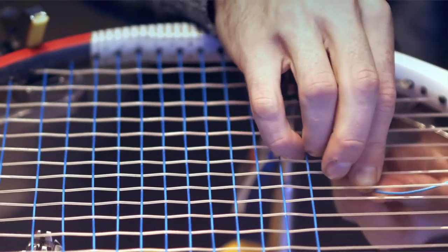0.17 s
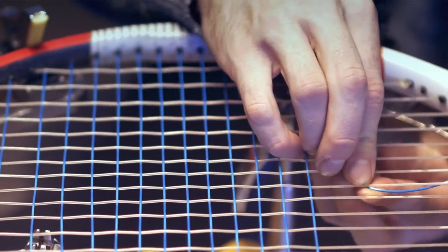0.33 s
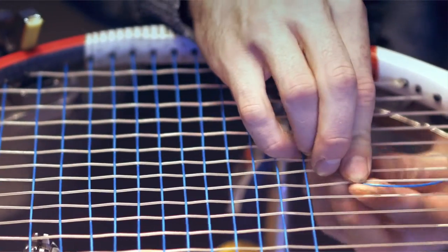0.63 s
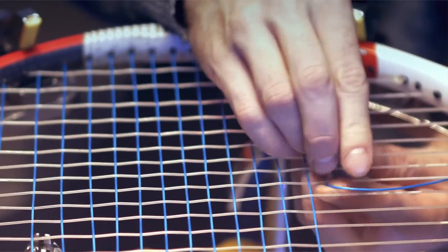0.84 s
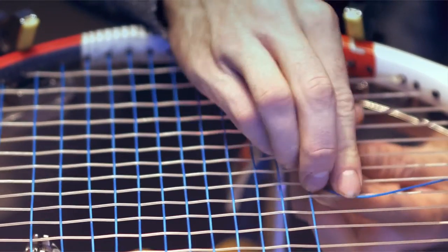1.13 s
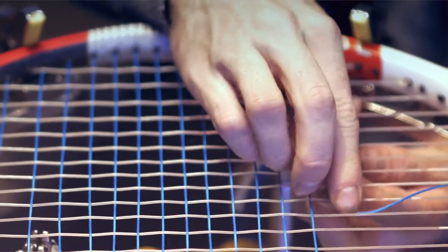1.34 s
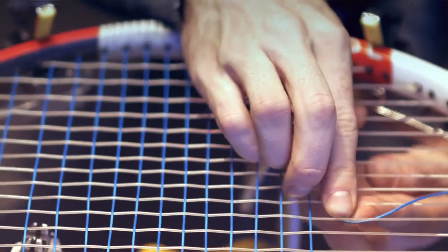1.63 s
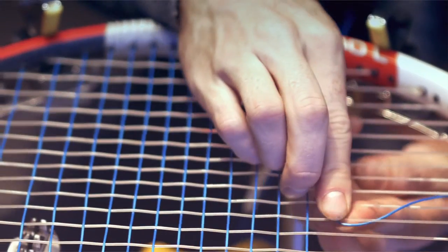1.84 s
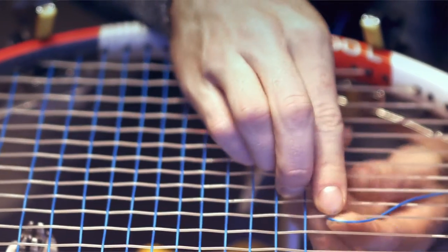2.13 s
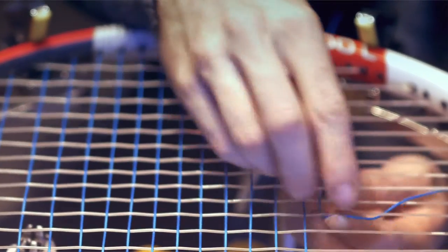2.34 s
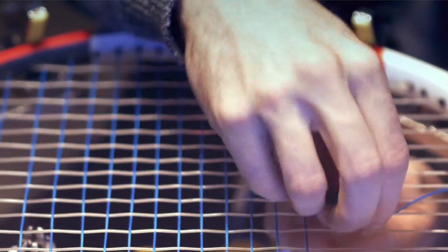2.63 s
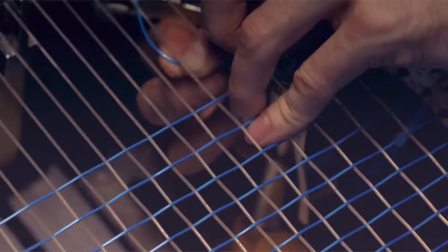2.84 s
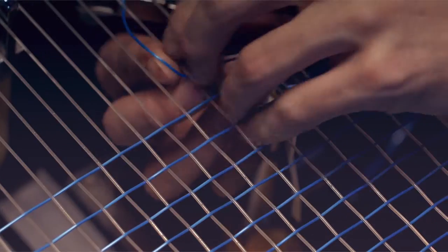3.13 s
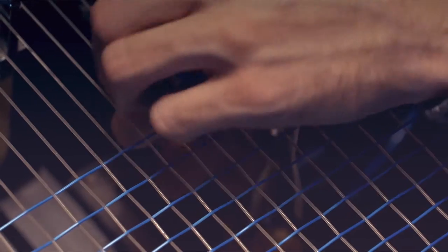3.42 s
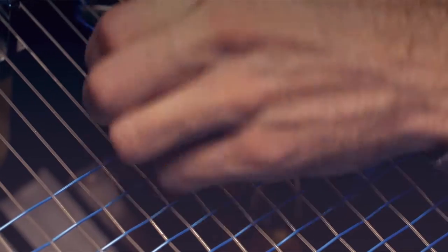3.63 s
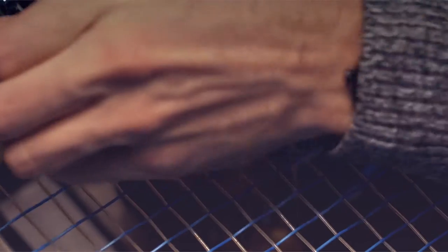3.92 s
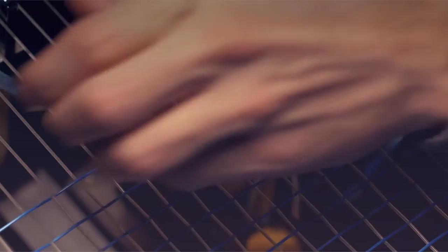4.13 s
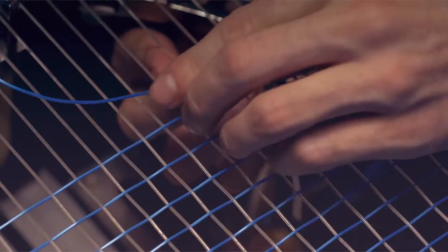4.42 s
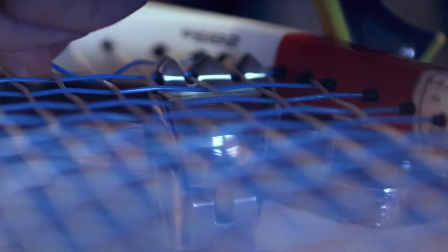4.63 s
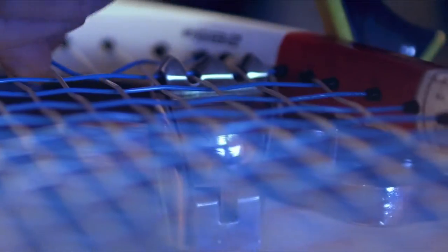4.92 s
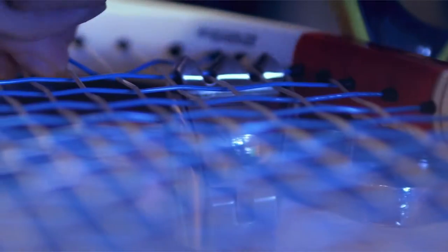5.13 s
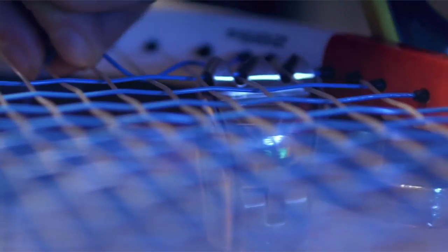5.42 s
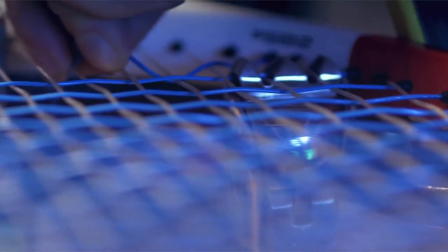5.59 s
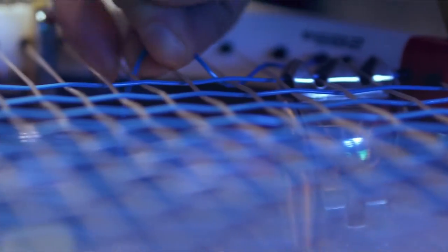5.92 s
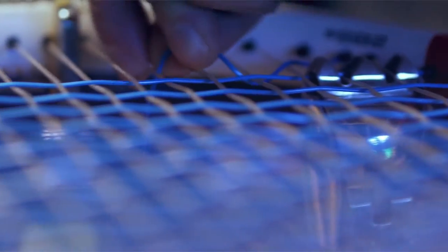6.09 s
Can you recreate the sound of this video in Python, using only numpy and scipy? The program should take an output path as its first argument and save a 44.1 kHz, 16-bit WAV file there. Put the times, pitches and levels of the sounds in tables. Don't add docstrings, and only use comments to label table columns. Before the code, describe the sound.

Stiff string is worked through a taut string bed, heard close with short, bright room reflections. Sparse snaps and soft rubs mix with muffled knocks on the frame and faint plucked twangs. A quick double flick follows midway, then a pause, light metal taps and a hard clamp clack. The background of rumble, hiss and electrical hum shifts subtly twice; hand movement ends it.

```python
import sys
import numpy as np
from scipy import signal
from scipy.fft import rfft, irfft, next_fast_len
from scipy.io import wavfile
from scipy.ndimage import uniform_filter1d, map_coordinates

SR = 44100
rng = np.random.default_rng(int(sys.argv[2]) if len(sys.argv) > 2 else 0)


def field_ratio(decibels):
    return 10 ** (np.asarray(decibels, dtype=float) / 20)


def transcribe(signal):
    frames = np.atleast_2d(signal).T
    limited = np.clip(frames, -1, 1)
    pcm = np.round(limited * 32767).astype(np.int16)
    wavfile.write(sys.argv[1], SR, pcm)


N = 275911
RING = SR * 3 // 5

# (time [s], peak level [dB], left-right [dB], room answer [dB])
SOFT_SNAP = [
    (0.3478, -36, -1, 4.8),
]
HARD_SNAP = [
    (1.7136, -30.5, -2, 6),
]
FLICKS = [
    (3.822, -35, .5, 5.5),
    (3.8275, -29.5, -.5, 0.5),
]
TICKS = [(2.676, -53, -1, 4), (3.218, -58, 1.5, 3), (3.49, -65, 0, 0), (3.649, -58, -1.5, 3),
         (3.731, -54, -.5, 0), (3.763, -61, .5, 0), (3.789, -54, .5, 0), (4.794, -62, 1.5, 3),
         (5.174, -63, .5, 0), (5.25, -65, 0, 0), (6.085, -65, 0, 0)]
RUBS = [
    (1.03, -65, 0, 3.9),
    (3.075, -66, 0.086, 4.1),
    (4.1186, -53, 1, 6.4),
    (4.386, -64, 0.11, 4.8),
    (4.402, -65, 0, 3.6),
]
# (frequency [Hz], density [dB per Hz])
SOFT_SNAP_COLOUR = [(88, -30), (150, -15.5), (239, -6), (471, -29), (550, -9.5), (827, -40), (948, -11),
                    (1020, -28), (1370, -9), (1660, -29), (3690, -15.5), (9920, -14.5), (15500, -22.5)]
HARD_SNAP_COLOUR = [(47, -49), (80, -20.5), (236, -0.5), (366, -20), (391, -10.5), (635, -13.5),
                    (884, -21.5), (1370, 2.5), (1830, -20), (2840, -4), (3540, -12.5), (8550, -3.5),
                    (15500, -14.5)]
FLICK_COLOUR = [(180, -37), (300, -12), (553, -6.5), (620, -15), (769, -18), (1260, -12), (1540, -21),
                (2040, -15.5), (3020, -10.5), (5480, -7.5), (7880, -7.5), (10400, 6), (15500, -5)]
TICK_COLOUR = [(1000, -51), (2000, -30.5), (3000, -15.5), (5000, -16), (8000, -23), (10000, 3),
               (13000, -14.5), (15500, -19.5)]
RUB_COLOUR = [(470, -52), (800, -6), (1270, 5), (1470, -5), (1880, -0.5), (5400, -4), (8030, -6),
              (10200, 3), (15500, -10.5)]
# (frequency [Hz], width [Hz], lift [dB])
SOFT_SNAP_MODES = [(1806, 77, 15.5), (4000, 1100, 4.5), (5300, 300, 2), (6440, 230, 2)]
HARD_SNAP_MODES = [(1166, 57, 10), (2834, 48, 5.9), (3030, 45, 11), (4260, 450, 7.2), (4740, 300, 9),
                   (6540, 220, 9.8), (8360, 200, 7.7), (10100, 620, 9)]
FLICK_MODES = [(200, 49, 6.9), (490, 44, 9.9), (2020, 100, 7.8), (2580, 60, 8.5), (4000, 170, 6.4),
               (5350, 80, 11), (6000, 200, 4.8), (6460, 350, 5.9), (9840, 1000, 5.6)]
RUB_MODES = [(2620, 110, 3.1), (5540, 120, 5), (6400, 270, 7.5), (8500, 130, 4.9)]


def string():
    soft_snap = contacts(SOFT_SNAP, SOFT_SNAP_COLOUR, SOFT_SNAP_MODES,
                         chatter_s=0.0023, build_s=0.0098, echo=(.008, .5))
    hard_snap = contacts(HARD_SNAP, HARD_SNAP_COLOUR, HARD_SNAP_MODES,
                         chatter_s=0.0029, build_s=0.014, echo=(.008, .6))
    flicks = contacts(FLICKS, FLICK_COLOUR, FLICK_MODES, chatter_s=0.0036, build_s=0.015)
    ticks = contacts(TICKS, TICK_COLOUR, [], chatter_s=0.002, build_s=0.0073)
    rubs = contacts(RUBS, RUB_COLOUR, RUB_MODES, chatter_s=0.005, build_s=0.013)
    return soft_snap + hard_snap + flicks + ticks + rubs


# (time [s], peak level [dB], pitch [Hz], T60 [s])
TWANGS = [
    (1.865, -59.5, 518, 0.17),
    (2.68, -60.5, 499, 0.32),
    (2.915, -58, 465, 0.27),
    (3.074, -44.5, 470, .15),
    (3.237, -52.5, 470, 0.21),
    (3.39, -59, 453, 0.15),
    (3.585, -59.5, 480, 0.33),
    (3.835, -61, 615, 0.23),
    (4.14, -64, 615, 0.19),
    (4.42, -67, 617, .25),
]
# (time [s], peak level [dB], pitch [Hz], T60 [s])
RINGS = [(1.73, -53.5, 1386, .42), (1.716, -64, 3030, 0.29), (1.717, -60, 4700, .35),
         (3.828, -64, 5460, 0.74), (5.251, -72.5, 4600, 0.14), (5.249, -71, 3150, 0.18),
         (5.493, -41.5, 2940, .45), (5.492, -44.5, 1207, 0.28), (5.492, -55, 865, 0.27),
         (6.24, -68, 1450, 0.14), (5.492, -52.5, 5310, .55), (5.492, -49.5, 663, 0.56)]


def string_bed():
    twangs = sum(decaying(s, db, hz, t60, attack_s=0.0041) for s, db, hz, t60 in TWANGS)
    rings = sum(decaying(s, db, hz, t60, attack_s=0.002, flutter=.8, rate=hz / 20)
                for s, db, hz, t60 in RINGS)
    return twangs + rings


def squeal():
    start_s, start_hz, level_db = 5.8, 2450, -78
    sag_hz_per_s, rise_s, fade_db_per_s = 330, .12, 8
    t = np.clip(np.arange(N) / SR - start_s, 0, None)
    pitch_hz = start_hz - sag_hz_per_s * t + 55 * wobble(120)
    phase = 2 * np.pi * np.cumsum(pitch_hz) / SR
    grip = np.clip(t / rise_s, 0, 1) * field_ratio(level_db - fade_db_per_s * t)
    return grip * (.9 + .6 * wobble(300)) * np.sin(phase)


# (time [s], peak level [dB], left-right [dB], room answer [dB])
KNOCKS = [
    (2.469, -38.5, -1.9, -3.5),
    (2.84, -53, -.5, -4),
]
THUDS = [
    (.156, -43, 1, -18),
    (.89, -55, -.5, 4.5),
    (1.417, -47, -1, -4.5),
    (2.55, -45.5, 0, 4.5),
    (2.68, -46, 0, 0),
    (3.08, -55, 0, 4),
    (3.24, -52, 0, 1),
    (5.745, -47, 0, 1),
]
# (frequency [Hz], density [dB per Hz])
KNOCK_COLOUR = [(25, -35), (60, -8.5), (150, -0.5), (220, -7), (305, 6.5), (420, -9), (580, -9.5),
                (720, -18), (860, -13.5), (1500, -28.5), (2200, -57)]
PALM_COLOUR = [(25, -36), (80, -10), (200, -3), (300, 6), (420, -6.5), (700, -42), (1500, -77)]


def frame():
    knocks = contacts(KNOCKS, KNOCK_COLOUR, [], chatter_s=0.0092, build_s=0.0041)
    thuds = contacts(THUDS, PALM_COLOUR, [], chatter_s=0.0014, build_s=0.019)
    return knocks + thuds


# (time [s], peak level [dB], left-right [dB], room answer [dB])
TAPS = [
    (5.268, -64, .5, 2),
    (5.249, -56.5, .5, 3.1),
]
TOUCH = [
    (5.4688, -33, 2, 6),
]
CLACK = [
    (5.4907, -13.5, 2.6, 3.78),
]
# (frequency [Hz], density [dB per Hz])
TAP_COLOUR = [(240, -39.5), (400, -16), (502, 7), (666, -12), (1260, 2.5), (1520, -5), (1810, -7),
              (4220, -10), (6000, -24.5), (7800, -73), (13200, -120)]
TOUCH_COLOUR = [(40, -53), (120, -23), (200, -5), (922, -1), (1950, -18.5), (3040, -10), (4110, -26),
                (14000, -36)]
CLACK_COLOUR = [(25, -61), (60, -50), (140, -20.5), (260, -33.5), (400, -13.5), (800, -21), (1450, -12),
                (3000, -16), (4000, -24), (5900, -29), (8500, -19), (12700, -20.5), (15500, -49)]
# (frequency [Hz], width [Hz], lift [dB])
TAP_MODES = [(1150, 98, 7.3), (1836, 170, 17), (2400, 93, 11), (3150, 120, 10), (3520, 100, 9.8),
             (4300, 120, 11), (4600, 100, 12)]
CLACK_MODES = [(320.3, 40.6, 16), (353, 20, 3.8), (465, 47, 11.1), (615, 96, 5.2), (863, 17, 11),
               (1210, 200, 6), (1476, 190, 7.6), (2030, 110, 4.2), (2890, 120, 3.2), (5040, 290, 8.3),
               (9050, 340, 6.2)]
# (frequency [Hz], level [dB], T60
# [s])
STEEL = [(313, -35, 0.51), (473, -35, 0.248), (1420, -57.5, .45), (451, -20.5, 0.051), (1450, -18.5, 0.024),
         (5350, -50, 0.49), (561, -42.5, 0.63)]


def clamp():
    taps = contacts(TAPS, TAP_COLOUR, TAP_MODES, chatter_s=0.0066, build_s=0.0031)
    touch = contacts(TOUCH, TOUCH_COLOUR, [], chatter_s=0.0074, build_s=0.014)
    clack = contacts(CLACK, CLACK_COLOUR, CLACK_MODES, chatter_s=0.0047, build_s=0.017, echo=(.017, .3))
    shut_s = CLACK[0][0]
    ring = sum(decaying(shut_s, db, hz, t60, attack_s=0.0025) for hz, db, t60 in STEEL)
    return taps + touch + clack + ring


# (frequency [Hz], level at each of the three positions [dB, dB, dB])
HUM = [(299.8, -71.5, -104, -71.5), (404, -95, -81.5, -83), (505, -90.5, -83, -88.5),
       (607, -105.5, -99.5, -91), (696, -102.5, -90, -107), (799, -99, -95, -90.5)]


def hum():
    t = np.arange(N) / SR
    position = positions()
    total = 0
    for hz, *levels_db in HUM:
        level_db = np.array(levels_db)[position] + 1.4 * wobble(9.6)
        phase = 2 * np.pi * hz * t + 0.14 * wobble(6)
        total = total + np.sqrt(2) * field_ratio(level_db) * np.sin(phase)
    return total


# (frequency [Hz], density [dB per Hz])
RUMBLE = [(12, -55.5), (20, -15.5), (92, -11), (171, -11), (266, -11.5), (298, -12), (420, -16.5),
          (573, -18), (822, -32.5), (1000, -24.5), (1300, -66), (2200, -120)]
HISS = [(410, -17), (700, 1), (824, -0.5), (970, 1), (1340, 4), (1630, -0.5), (2980, -2.5), (8000, -12),
        (10400, -46), (17600, -120)]
AIR = [(4120, -61.5), (7000, -6.5), (7400, -17.5), (8240, -9), (9360, 0.5), (10800, -2), (14900, -6.5),
       (16000, -15.5)]
# (rumble [dB], hiss [dB], air [dB])
QUIET = [
    (-73.5, -79, -81.5),
    (-73, -79.5, -82.5),
    (-73, -81, -82.5),
]
# (frequency [Hz], correlation [-1 to 1])
TONE_ALIKE = [(60, 0.46), (130, 0.86), (290, 0.9), (640, 0.38), (1410, -0.27), (3100, 0.083), (6820, 0.33),
              (15000, 0.67)]
# (start [s], length [s], lift [dB])
MOVES = [
    (.55, 0.98, 5),
    (1.85, 1.2, 5.5),
    (2.9, 0.42, 0.5),
    (5.5, 0.94, 10),
]
# (start [s], length [s], lift [dB])
DRAGS = [
    (2.28, 0.28, 5),
    (3.0, 0.43, 1),
    (3.62, 0.086, 3.5),
    (3.9, .5, 2.5),
    (4.75, 0.36, 1),
]
# (start [s], length [s], lift of the rumble [dB])
LEANS = [
    (1.82, 0.23, 4),
    (2.45, 1.0, 3.5),
    (4.2, 0.46, -2.5),
    (5.72, 0.12, 1.5),
    (5.95, 0.54, 2.5),
]
MOVE_SHARE = [0.39, 0.88, .05]
DRAG_SHARE = [0.14, 0.24, 1]


def room_tone():
    levels_db = np.array(QUIET)[positions()].T
    levels_db = levels_db + np.outer(MOVE_SHARE, swells(MOVES, edge=0.38))
    levels_db = levels_db + np.outer(DRAG_SHARE, swells(DRAGS, edge=0.11))
    levels_db[0] += swells(LEANS, edge=0.24)
    total = 0
    for spectrum, level_db, swell_db in zip([RUMBLE, HISS, AIR], levels_db, [1.5, .6, .5]):
        noise = filtered(rng.standard_normal((2, N)), lambda hz: field_ratio(along(spectrum, hz)))
        total = total + unit(diffuse(noise, TONE_ALIKE)) * field_ratio(level_db + swell_db * wobble(15))
    return total


SCENE_CHANGES = [2.87, 4.62]


def positions():
    return np.searchsorted(SCENE_CHANGES, np.arange(N) / SR)


def swells(rows, edge):
    t = np.arange(N) / SR
    ramp = lambda u: np.sin(np.pi / 2 * np.clip(u, 0, 1)) ** 2
    total = 0
    for start, span, db in rows:
        rise = ramp((t - start) / (edge * span))
        fall = ramp((start + span - t) / (edge * span))
        total = total + db * rise * fall
    return total


def contacts(events, colour, modes, chatter_s, build_s, echo=(0, 0)):
    out = np.zeros((2, N + RING))
    t = np.arange(RING // 6) / SR
    impulse = filtered(1. * (t == 0), causal(colour, modes))
    impulse /= np.linalg.norm(impulse)
    late = np.clip(t - echo[0], 0, None)
    shake = np.exp(-t / chatter_s) + echo[1] * (late > 0) * np.exp(-late / chatter_s)
    size = np.linalg.norm(shake)
    for s, db, pan_db, room_db in events:
        chatter = rng.standard_normal((2, len(t))) * shake
        near, sideways = signal.fftconvolve(chatter, impulse[None], axes=1)
        near, sideways = size / np.linalg.norm(near) * np.array([near, sideways])
        scatter = filtered(sideways, lambda hz: hz / (hz + 1500)) * [[1], [-1]]
        blow = near + 0.5 * scatter
        both = signal.fftconvolve(impulse[None], tail(build_s), axes=1)[:, :RING]
        both *= field_ratio(room_db) * size
        both[:, :len(near)] += blow * field_ratio([[pan_db / 2], [-pan_db / 2]])
        out[:, round(s * SR):][:, :RING] += field_ratio(db - 5.0) * both
    return out[:, :N]


def decaying(s, db, hz, t60, attack_s, flutter=0, rate=40):
    t = np.arange(RING) / SR
    envelope = field_ratio(db - 60 * t / t60) * (1 - np.exp(-t / attack_s))
    tone = envelope * np.sin(2 * np.pi * hz * t + 0.84 * wobble(rate, size=RING))
    tone = tone * (1 + flutter * wobble(rate, size=RING))
    return np.pad(tone, (round(s * SR), N))[:N]


# (frequency [Hz], T60 [s])
WALLS = [(100, 0.71), (400, 0.5), (1500, 0.47), (5000, 0.51), (9000, 0.46), (15000, 0.27)]
# (frequency [Hz], correlation [-1 to 1])
ALIKE = [(60, .9), (130, .97), (290, .99), (640, .88), (1410, .2), (3100, .25), (6820, .25), (15000, .35)]


def tail(build_s):
    age = np.arange(RING) / SR
    spiky = field_ratio(7.9 * np.exp(-age / 0.088) * np.clip(rng.standard_normal(RING), -2, 2))
    hz, t, z = signal.stft(rng.standard_normal((2, RING)) * unit(spiky), SR, nperseg=256)
    lasting = uniform_filter1d(rng.standard_normal(z.shape[1:]), size=24, axis=1)
    z = z * field_ratio(2.5 * unit(lasting))
    decay = field_ratio(-60 * t / along(WALLS, hz)[:, None])
    pair = signal.istft(z * decay, SR, nperseg=256)[1][:, :RING]
    pair = diffuse(pair, ALIKE) * (1 - np.exp(-(age / build_s) ** 2))
    return pair / np.linalg.norm(pair[0])


def diffuse(pair, alike):
    turn = lambda hz: np.arccos(np.clip(along(alike, hz), -1, 1)) / 2
    mid, side = filtered(pair, lambda hz: np.array([np.cos(turn(hz)), np.sin(turn(hz))]))
    return np.array([mid + side, mid - side])


def causal(colour, modes):
    def response(hz):
        lift_db = sum(db / (1 + (2 * (hz - centre) / width) ** 2) for centre, width, db in modes)
        cepstrum = irfft(np.log(field_ratio(along(colour, hz) + lift_db) + 1e-6))
        cepstrum[1:len(hz) - 1] *= 2
        cepstrum[len(hz):] = 0
        return np.exp(rfft(cepstrum, len(cepstrum)))
    return response


def filtered(x, response):
    m = next_fast_len(x.shape[-1] + 8192)
    return irfft(rfft(x, m) * response(np.fft.rfftfreq(m, 1 / SR)), m)[..., :x.shape[-1]]


def wobble(rate, size=N):
    knots = rng.standard_normal(int(size * rate / SR) + 4)
    return map_coordinates(knots, [np.arange(size) * rate / SR])


def along(points, hz):
    f, v = np.transpose(points)
    return np.interp(np.log(hz + 1), np.log(f + 1), v)


def unit(x):
    return x / np.sqrt(np.mean(x ** 2) + 1e-20)


def scene():
    return string() + string_bed() + squeal() + frame() + clamp() + hum() + room_tone()


def roll_off(x):
    return signal.sosfilt(signal.butter(12, 16330, fs=SR, output="sos"), x)


def record(dry):
    def microphone(hz):
        notch = 1 - .5 * np.exp(-((hz - 7900) / 150) ** 2)
        return notch / (1 + (hz / 15650) ** 120)
    balance_db = [[-.3], [.3]]
    mix = filtered(dry, microphone) * field_ratio(balance_db)
    return roll_off(mix)


dry = scene()
out = record(dry)
transcribe(out)
```